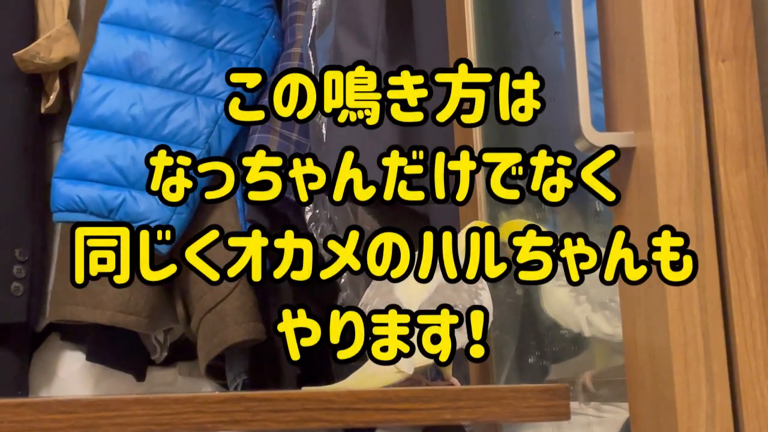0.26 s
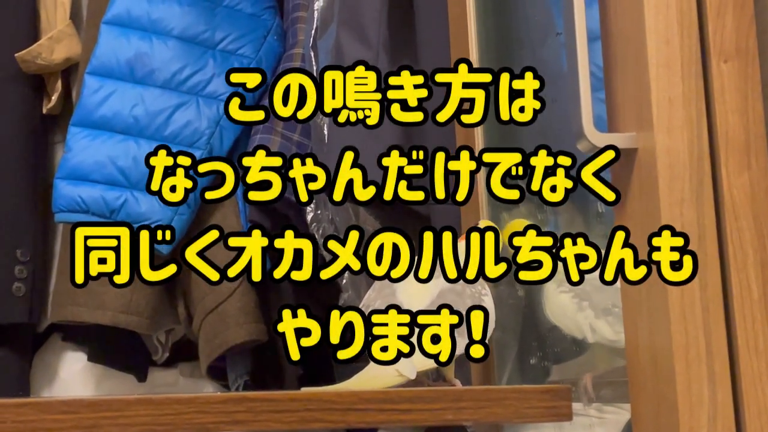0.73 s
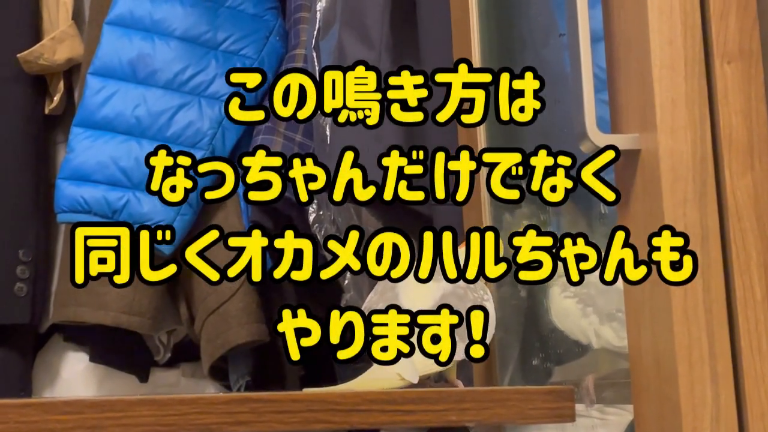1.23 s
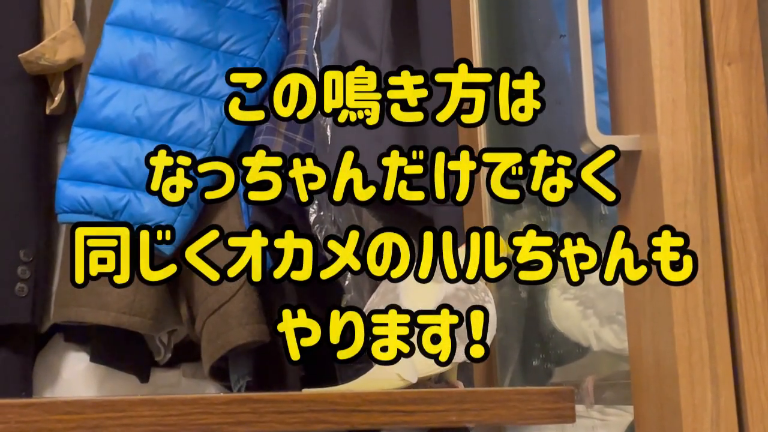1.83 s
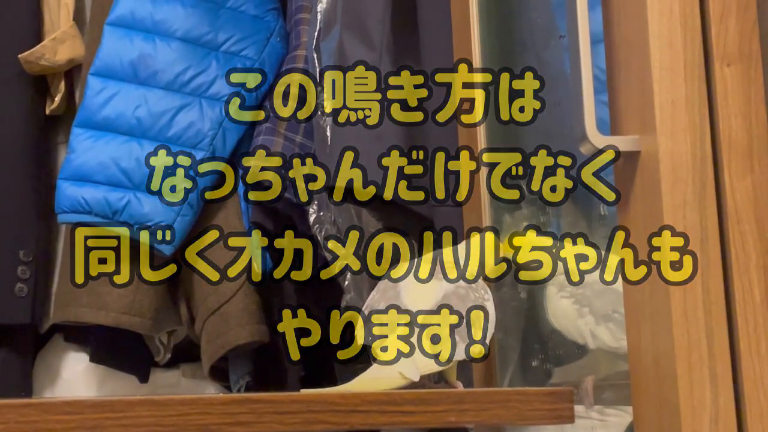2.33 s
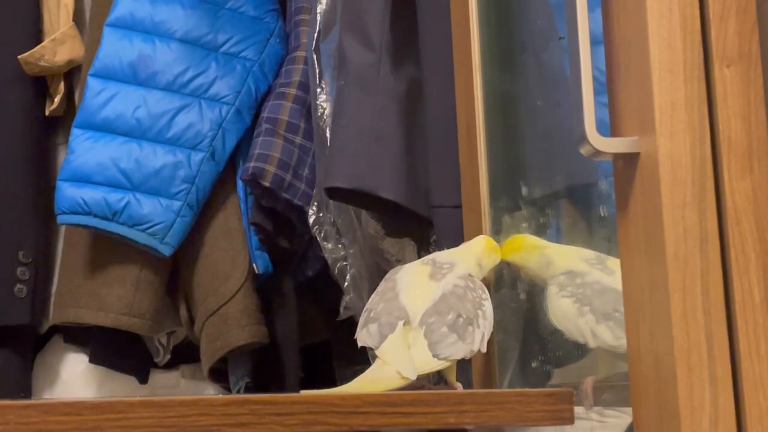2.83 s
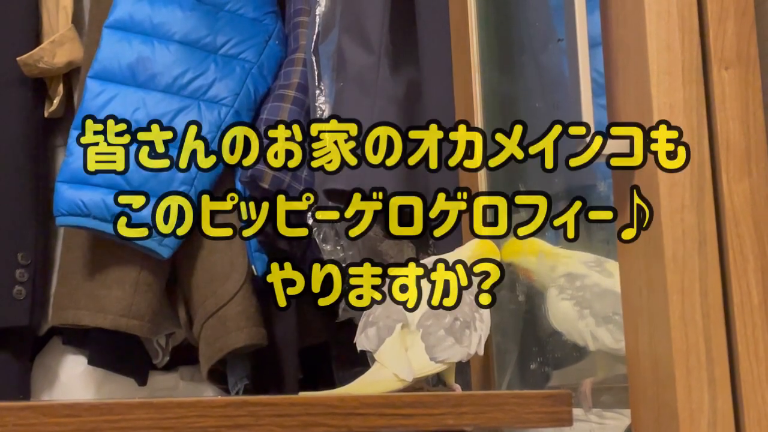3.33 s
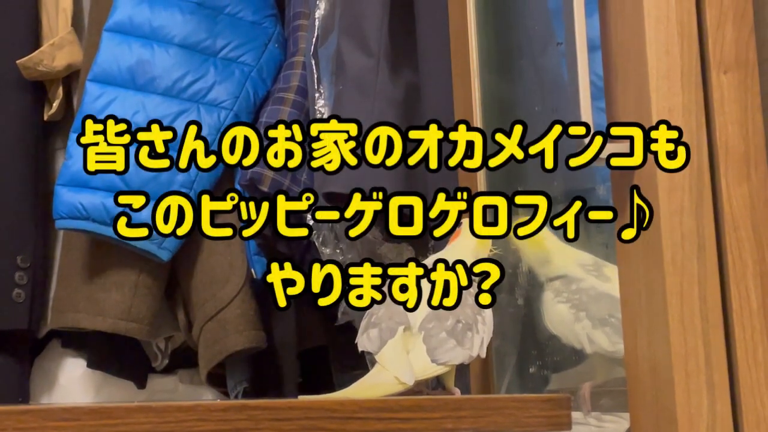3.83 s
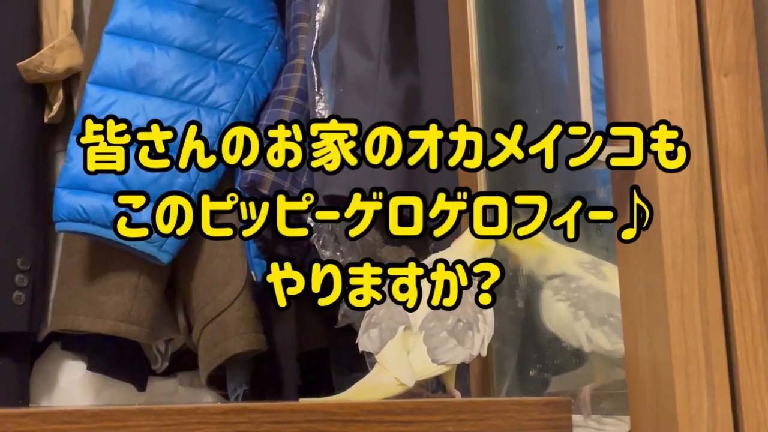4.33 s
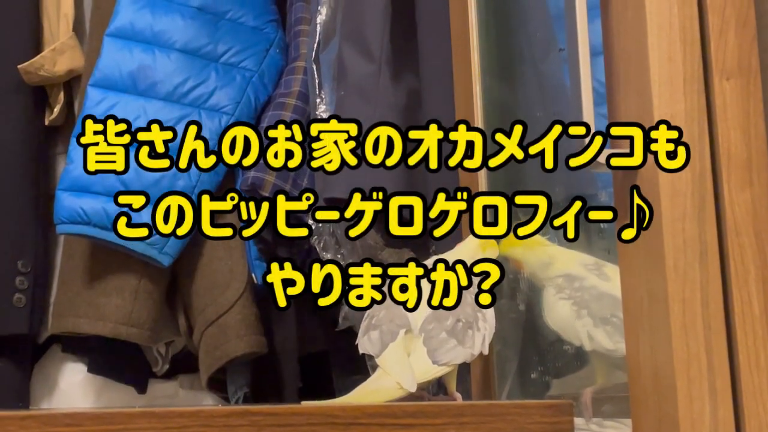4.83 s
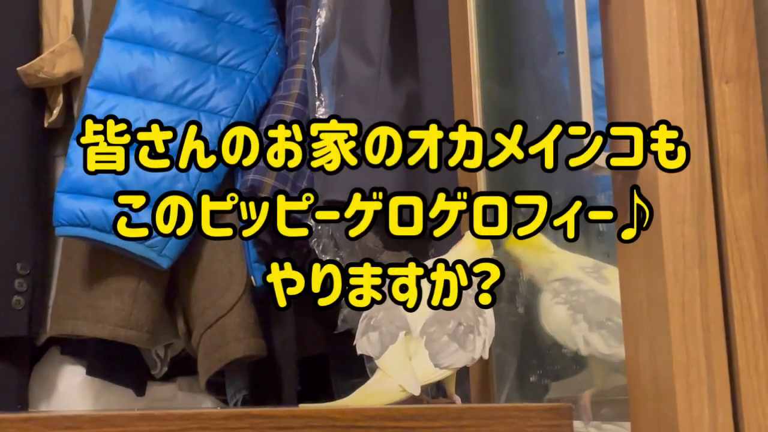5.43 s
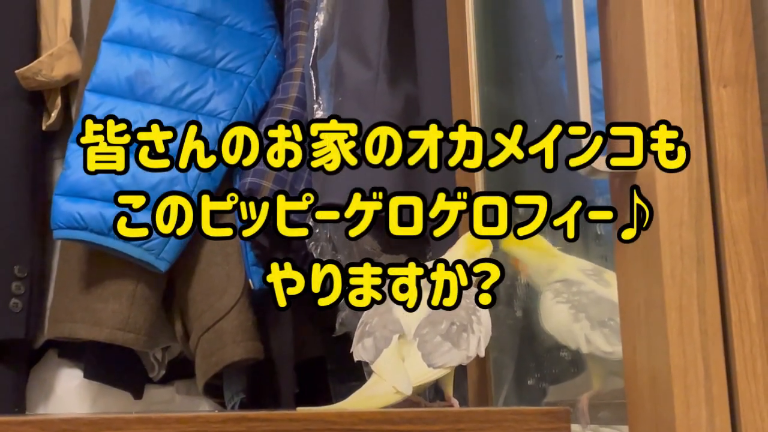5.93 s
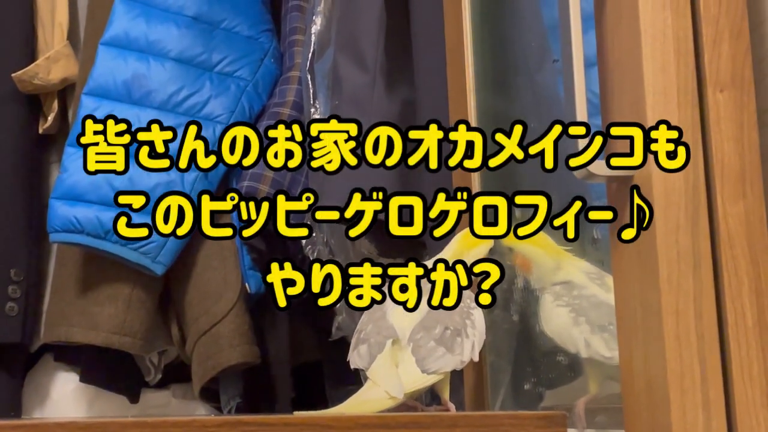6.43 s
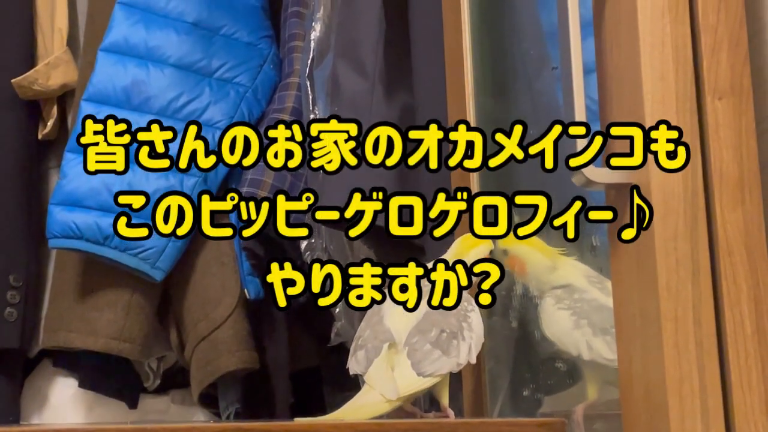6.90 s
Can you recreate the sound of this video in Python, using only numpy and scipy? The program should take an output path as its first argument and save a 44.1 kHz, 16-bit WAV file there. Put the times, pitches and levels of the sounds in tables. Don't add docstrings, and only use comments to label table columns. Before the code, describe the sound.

Pet cockatiel at a mirror runs through a looping song of clear whistles, raspy croaks and buzzy trills, with faint household hum in the gaps.

```python
import sys
import numpy as np
from scipy import signal
from scipy.fft import rfft, irfft, next_fast_len
from scipy.io import wavfile
from scipy.ndimage import uniform_filter1d, map_coordinates

SR = 44100
rng = np.random.default_rng(int(sys.argv[2]) if len(sys.argv) > 2 else 0)


def persist_wave(psi):
    counts = np.round(np.clip(psi, -1, 1) * 32767).astype(np.int16)
    wavfile.write(sys.argv[1], SR, np.atleast_2d(counts).T)


def linear_from_db(decibels):
    return 10 ** (np.asarray(decibels, float) / 20)


N = 315756

# frequency in Hz, density in dB per Hz.
HUM_DB = [(12, -43.5), (20, -20.5), (63, 1.5), (104, -1), (196, -13.5), (288, -13.5), (572, -14.5),
          (693, -21), (1240, -28.5), (1670, -32), (2390, -29.5), (3320, -49), (4030, -44), (4750, -52),
          (14300, -75.5)]
# frequency in Hz, correlation from 0 to 1.
HUM_LIKENESS = [(60, 1), (200, .75), (600, .35), (1300, 0.05), (4000, 0.24)]
# frequency in Hz, T60 in seconds.
ROOM_T60_S = [(800, 0.15), (1600, .24), (2500, 0.22), (4000, 0.2), (8000, 0.16)]
# delay in seconds, level in dB.
WALL_COPIES = [(.0011, -17), (.0034, -11.5), (.0062, -14.5), (0.0104, -12), (.016, -12), (.023, -14)]
# frequency in Hz, phase in radians.
WALL_TURN_RAD = [(500, .7), (1500, 1.1), (2000, .35), (4000, .45), (7000, .1)]
# frequency in Hz, lead in radians.
PORT_LEAD_RAD = [(60, 0), (430, .6), (1120, -.2), (2760, .3), (4910, .1), (6890, -.9), (8300, -3.1),
                 (11000, -6), (12800, -7.2), (14400, -9.4)]
# frequency in Hz, left over right in dB.
PORT_BALANCE_DB = [(100, .5), (370, 4.5), (1230, .5), (2250, 1.2), (4120, 0)]
# frequency in Hz, level in dB.
BEAK_DB = [(2500, 16), (5000, 0), (6500, -17), (7600, -22), (8400, -26), (10400, -37), (12000, -43),
           (14500, -26), (16000, -54)]
# frequency in Hz, level in dB.
RASP_DB = [(500, -38), (1000, -19.5), (1700, -3), (3800, 3.5), (5200, -19), (6500, -18.5), (8000, -22),
           (11400, -39.5), (15500, -53.5)]
# frequency in Hz, level in dB.
NOSTRIL_DB = [(7000, -29), (8500, -5), (10500, 0), (12300, -4), (13500, -16), (15500, -12.5)]

SYLLABLES_A = { "dip": [(0, 1.02, -10, -27, -55), (.04, 1, -1, -27, -55), (.3, .97, -2, -27, -48),
               (.5, .83, -2, -26, -42), (.8, .85, -4, -33, -42), (.97, .99, -6, -35, -50)],
               "pipe": [(0, 1, -5, -36, -51), (.25, 1, -4, -34, -55), (.4, 1, 0, -31, -55),
               (.54, 1, -5, -30, -50), (.62, .97, -30, -30, -45), (.68, .97, -30, -30, -45),
               (.76, 1, -9, -36, -45), (1, 1, -24, -40, -45)], "pip": [(0, .8, -19, -14, -32),
               (.09, .8, -9, -10, -32), (.42, 1, 0, -30, -42), (.66, .95, -2, -39, -47),
               (.88, .69, -21, -26, -30), (1, .65, -50, -26, -30)], "croak": [(0, 1.02, -5, 3, -8),
               (.2, .99, 0, -5, -7), (.45, .97, -4, -3, -6), (.6, .95, -11, 5, 0), (.85, .93, -15, 7, 1),
               (1, .92, -30, 5, -1)], "caw": [(0, 1.02, -6, -10, -10), (.17, 1, 1, -6, -4), (.3, 1, 0, -13, -4),
               (.45, .99, 0, -6, -9), (.6, .97, -8, 2, -2), (.85, .92, -15, 3, -1), (1, .9, -28, 3, -1)], }
SYLLABLES_B = { "squeak": [(0, .32, -25, -24, -44), (.07, .36, 2, -24, -44), (.24, .62, -3, -39, -39),
               (.36, .97, -14, -38, -38), (.6, 1, -1, -35, -37), (1, .97, -20, -33, -36)],
               "flat": [(0, .95, -10, -15, -40), (.08, .98, -4, -15, -40), (.35, 1, -1, -18, -27),
               (.67, 1, 0, -5, -26), (.84, 1, -17, -13, -16), (1, .97, -25, -13, -16)],
               "lead": [(0, .97, -14, -13, -20), (.08, 1, -2, -15, -17), (.97, 1, 0, -19, -18)],
               "rise": [(0, .55, -14, -18, -27), (.3, .66, -8, -25, -30), (.58, .86, -1, -27, -36),
               (.66, 1, 0, -27, -46), (.86, .99, -4, -30, -50), (1, 1, -25, -30, -44)], }
SYLLABLES_C = { "low": [(0, .95, -30, -11, -26), (.04, 1, -8, -11, -26), (.3, 1, -8, -12, -18),
               (.65, 1.05, -2, -15, -21), (.8, 1.04, 0, -15, -30), (1, .99, -14, -10, -30)],
               "leap": [(0, .42, -7, -22, -50), (.1, .45, -4, -23, -52), (.32, .58, 4, -27, -50),
               (.48, .7, -6, -40, -40), (.57, .98, -3, -36, -45), (.75, 1.01, -1, -36, -45),
               (.92, .98, -4, -38, -45), (.995, .78, -8, -40, -45)], "warble": [(0, .8, -20, 10, -30),
               (.07, .79, -12, 8, -22), (.2, .78, -9, 6, -22), (.42, .73, -11, 1, -28),
               (.61, .65, -18, -4, -40), (.84, .7, -16, 0, -38), (.97, .77, -13, -6, -28)],
               "hold": [(0, 1, -12, -10, -25), (.25, 1, 0, -16, -18), (.75, 1, -4, -18, -7),
               (.97, 1, 0, -7, -18)], "held": [(0, 1, -8, -8, -20), (.3, 1, 0, -14, -12), (.6, 1, 0, -16, -8),
               (.72, 1, -13, -6, 2), (.99, 1, -16, -2, 3)], }
SYLLABLES_D = { "swoop": [(0, 1.12, -14, -25, -45), (.3, 1, 0, -25, -45), (.55, .9, -1, -20, -35),
               (.95, .52, -5, 0, -17)], "climb": [(.045, .61, -20, -2, 3), (.075, .63, 0, -8, -14),
               (.3, .77, -1, -21, -35), (.35, .89, -2, -28, -45), (.61, 1.005, 2, -33, -58),
               (.68, 1, -12, -28, -45), (.73, 1.02, -4, -25, -45), (.8, .97, -10, -8, -36),
               (1, 1, -14, -27, -50)], "stair": [(0, .615, -6, -8, -20), (.13, .69, 0, -15, -31),
               (.31, .717, -3, -24, -45), (.39, .92, -5, -28, -51), (.59, 1, 0, -37, -56),
               (.84, 1, 0, -48, -63), (1, 1.015, -20, -48, -63)], }
SYLLABLES_E = { "rasp": [(0, 1, -22, -12, -30), (.06, 1, -8, -7, -29), (.36, 1.07, -9, 0, -15),
               (.63, 1.01, 0, -2, -17), (.9, 1, 0, 3, -11), (.97, 1.03, 1, -5, -17)],
               "trill": [(0, .79, -7, -8, -19), (.22, .875, -3, -30, -31), (.55, .99, 0, -26, -45),
               (.78, 1.01, -12, -23, -54), (1, 1, -23, -23, -54)], "long trill": [(0, .64, -11, -11, -21),
               (.11, .69, -7, -25, -32), (.41, .835, -1, -23, -40), (.75, .97, -1, -23, -38),
               (.86, 1.1, -3, -31, -38), (.94, 1.28, -10, -31, -38), (1, 1.3, -20, -31, -38)], }
SYLLABLES = SYLLABLES_A | SYLLABLES_B | SYLLABLES_C | SYLLABLES_D | SYLLABLES_E | {"cracked rise": SYLLABLES_B["rise"]}
CROAKS = {"dip": [(.32, 1.03, .1, 82, .19)], "pip": [(.7, 1, .12, 80, 0)],
          "croak": [(.14, .45, .36, 89, .03), (.45, 1, .52, 89, .05)], "swoop": [(0, 1, .2, 90, 0)],
          "caw": [(.05, .35, .14, 110, .02), (.35, 1, .55, 89, .03)], "held": [(0, .4, .2, 90, .02)],
          "squeak": [(.07, .4, .35, 90, .02), (.5, .85, .1, 90, .01)], "flat": [(.05, .46, .04, 79, .035)],
          "cracked rise": [(0, .7, .2, 78, .09)], "leap": [(0, .55, .22, 89, .06), (.55, 1, .07, 89, .015)],
          "warble": [(-.06, .55, .13, 60.6, .1), (.55, .75, .12, 90, .03), (.75, 1, .26, 90, .06)],
          "climb": [(.12, .38, .03, 100, .03), (.65, .7, .3, 90, 0), (.76, .86, .45, 90, .02),
          (.86, 1, .15, 90, .007)], "hold": [(0, .3, .25, 90, .02), (.3, .8, .1, 90, .01)],
          "stair": [(.11, .41, 0, 90, .024)], "rasp": [(0, .56, .32, 100, .04), (.56, 1, .05, 100, .01)],
          "trill": [(.02, .89, 0, 82.5, .09)], "long trill": [(0, 1, .035, 92.3, .085)]}
SLIDES = {"rasp": [(0, 1.3), (.55, 2)], "warble": [(0, 1.56), (.42, 1.33), (.6, 1.06), (.84, 1.4),
          (1, 1.85)], "hold": [(0, 1.85), (.3, 2)], "held": [(0, 1.85), (.3, 2)], "climb": [(.76, 2),
          (.79, 1.65), (.84, 1.65), (.87, 2)], "croak": [(.15, 2), (.3, 2.15), (1, 2.15)], "caw": [(.3, 2),
          (.4, 2.15), (1, 2.15)]}
# syllable, start in seconds, length in seconds, level in dB,
# glide start in Hz, glide end in Hz.
SHORT_CALLS = [("dip", .043, .074, -18, 2270, 2150), ("pipe", .117, .061, -13, 2145, 2150),
               ("pip", .41, .048, -11.5, 2380, 2330), ("caw", 1.598, .07, -24.5, 1750, 1650),
               ("squeak", 1.98, .07, -36, 4120, 4120), ("flat", 2.608, .092, -21, 1620, 1620),
               ("lead", 2.784, .028, -31, 1280, 1215), ("rise", 2.812, .073, -12, 2230, 2540),
               ("swoop", 3.167, .017, -23.5, 3800, 3800), ("croak", 3.184, .084, -23, 1860, 1800),
               ("dip", 3.519, .078, -17, 2100, 2110), ("pipe", 3.597, .036, -19, 2110, 2130),
               ("pip", 3.856, .046, -8, 2400, 2460), ("swoop", 5.062, .013, -29, 2650, 3400),
               ("croak", 5.076, .074, -22, 1830, 1800), ("lead", 5.938, .062, -30, 1235, 1270),
               ("cracked rise", 6.0, .07, -22, 2300, 2080), ("pip", 6.339, .045, -12, 2340, 2320),
               ("dip", 6.663, .087, -19, 2180, 2160), ("pipe", 6.749, .046, -12, 2150, 2150)]
# syllable, start in seconds, length in seconds, level in dB,
# glide start in Hz, glide end in Hz.
PHRASES = [("low", .662, .128, -27, 1245, 1230), ("leap", .808, .072, -26, 3600, 3280),
           ("warble", .88, .19, -23, 2010, 2010), ("held", 1.07, .07, -21, 1530, 1640),
           ("climb", 1.14, .16, -16.5, 2680, 2685), ("rasp", 2.218, .112, -25, 1510, 1515),
           ("trill", 2.33, .09, -16, 2000, 2000), ("low", 4.122, .123, -26, 1230, 1270),
           ("leap", 4.252, .073, -26, 3300, 3470), ("warble", 4.325, .187, -22.5, 1960, 2010),
           ("hold", 4.512, .091, -21, 1570, 1670), ("stair", 4.603, .162, -13, 2722, 2725),
           ("rasp", 5.38, .115, -25, 1550, 1510), ("long trill", 5.495, .133, -11, 2480, 2480),
           ("low", 6.953, .132, -27, 1220, 1250), ("leap", 7.097, .073, -26, 3400, 3550)]
SONG = SHORT_CALLS + PHRASES

ATTACK_S, JOIN_S = .002, .003
WHISPER_S, WHISPER_DB = .011, -26
LATE_DB, LATE_T60_RATIO_S = -22, 1.9
SWAP_DB = 70
SUM_DB, DIFFERENCE_DB, OCTAVE_DB = -19, -22, -25
SHIVER_RAD = .045


def unit(x):
    return x / np.sqrt(np.mean(x ** 2) + 1e-20)


def along(points, hz):
    f, v = np.transpose(points)
    return np.interp(np.log(hz + 1), np.log(f + 1), v)


def wobble(rate_hz, samples):
    knots = rng.standard_normal(int(N * rate_hz / SR) + 4)
    return map_coordinates(knots, [samples * rate_hz / SR])


def filtered(x, response):
    m = next_fast_len(N + SR // 2)
    return irfft(rfft(x, m) * response(np.fft.rfftfreq(m, 1 / SR)), m)[..., :N]


def hiss(spectrum_db):
    return unit(filtered(rng.standard_normal(N), lambda f: linear_from_db(along(spectrum_db, f))))


def household(patchy_db):
    z = signal.stft(rng.standard_normal((2, N)), nperseg=1024)[2]
    patches = uniform_filter1d(rng.standard_normal(z.shape[1:]), size=5, axis=0)
    patches = uniform_filter1d(patches, size=8, axis=1)
    pair = signal.istft(z * linear_from_db(patchy_db * unit(patches)), nperseg=1024)[1][:, :N]

    def mid_side(f):
        turn_rad = np.arccos(np.clip(along(HUM_LIKENESS, f), -1, 1)) / 2
        return linear_from_db(along(HUM_DB, f)) * [np.cos(turn_rad), np.sin(turn_rad)]

    mid, side = filtered(pair, mid_side)
    return unit(np.array([mid + side, mid - side]))


def ducking(x, start_db, slope, lag_s):
    pole = np.exp(-1 / (lag_s * SR))
    slow = x ** 2
    for _ in range(2):
        slow = signal.lfilter([1 - pole], [1, -pole], slow)
    over_db = 10 * np.log10(slow + 1e-12) - start_db
    return linear_from_db(-slope * uniform_filter1d(np.clip(over_db, 0, None), size=3000))


def room(x, shared):
    hz, t, z = signal.stft(rng.standard_normal((2, SR // 2)), SR, nperseg=256)
    t60_s = along(ROOM_T60_S, hz)[:, None]
    early = linear_from_db(-60 * t / t60_s)
    late = linear_from_db(LATE_DB - 60 * t / LATE_T60_RATIO_S / t60_s)
    common, apart = signal.istft(z * (early + late), SR, nperseg=256)[1]
    tails = np.array([shared * common + apart, shared * common - apart])
    tails = tails / np.linalg.norm(tails[0])
    return signal.fftconvolve(np.pad(x, (200, 0))[None], tails, axes=1)[:, :N]


def near_walls(x):
    side = np.array([[1], [-1]])

    def response(f):
        total = 1
        for k, (delay_s, db) in enumerate(WALL_COPIES):
            turn_rad = (-1) ** k * side * along(WALL_TURN_RAD, f)
            total = total + linear_from_db(db) * np.exp(-2j * np.pi * f * delay_s + 1j * turn_rad)
        return total

    return filtered(x, response)


def breath():
    t = np.arange(N) / SR
    on = np.zeros(N, bool)
    for _, start, length, *_ in SONG:
        on |= (t > start) & (t < start + length + JOIN_S)
    lead = round(WHISPER_S * SR)
    ahead = np.pad(on[lead // 2:] * 1., (0, lead // 2), "edge")
    whisper = linear_from_db(WHISPER_DB) * uniform_filter1d(ahead, size=lead)
    since_onset_s = t - np.maximum.accumulate(t * ~on)
    caught = np.clip(since_onset_s / ATTACK_S, 0, 1) ** 2
    return [np.round(uniform_filter1d(v, size=90), 9) for v in (caught, whisper)]


def gestures():
    rows = []
    for name, start, length, db, from_hz, to_hz in SONG:
        for share, pitch, rel_db, second_db, third_db in SYLLABLES[name]:
            hz = pitch * from_hz * (to_hz / from_hz) ** share
            rows.append((start + share * length, hz, db + rel_db, second_db, third_db))
    s, *columns = np.transpose(sorted(rows))
    return [np.interp(np.arange(N) / SR, s, column) for column in columns]


def croak():
    t = np.arange(N) / SR
    rough, warble, multiple = np.zeros(N), np.zeros(N), np.full(N, 2.)
    for name, start, length, *_ in SONG:
        for first, last, share, rate_hz, depth in CROAKS.get(name, []):
            a, b = start + first * length, start + last * length
            on = (t >= a) & (t < b)
            rough[on] = share
            fade = signal.windows.tukey(round((b - a) * SR) + 2, .4)[:on.sum()]
            warble[on] = depth * fade * np.cos(2 * np.pi * rate_hz * (t[on] - (a + b) / 2))
        if name in SLIDES:
            multiple += np.interp((t - start) / length, *np.transpose(SLIDES[name]), left=2, right=2) - 2
    return uniform_filter1d(rough, size=450), warble, multiple


def second_voice(hz, phase, upper, multiple, second_db, turns_db):
    loose = np.clip(8 * (2 - multiple), 0, 1)

    def heard(share):
        return np.clip(share * hz / 200 - 3.5, 0, 1)

    octave = loose * linear_from_db(OCTAVE_DB) * np.sin(2 * upper)
    tone = linear_from_db(second_db + turns_db) * (np.sin(upper) + octave)
    differences = heard(multiple - 1) * np.sin(upper - phase) + heard(2 - multiple) * np.sin(2 * phase - upper)
    products = linear_from_db(SUM_DB) * np.sin(upper + phase) + linear_from_db(DIFFERENCE_DB) * differences
    return tone + loose * linear_from_db(second_db / 2) * products


def high_partials(hz, shiver, third_db, shake):
    source_db = third_db - along(BEAK_DB, 3 * hz)
    tone = 0
    for k in range(3, 13):
        size = linear_from_db(source_db + along(BEAK_DB, k * hz)) + linear_from_db(along(NOSTRIL_DB, k * hz) - 47)
        tone = tone + size * linear_from_db(3.8 * shake(200)) * (k * hz < 16000) * np.sin(k * shiver)
    return tone


def cockatiel():
    caught, whisper = breath()
    on = caught + whisper > 0
    hz, db, second_db, third_db, rough, warble, multiple = [v[on] for v in (*gestures(), *croak())]
    caught, whisper = caught[on], whisper[on]
    samples = np.flatnonzero(on)

    def shake(rate_hz):
        return wobble(rate_hz, samples)

    rough = rough + .08 * (1250 / hz) ** 2.5
    hz = hz * (1 + warble + rough * .06 * shake(200))
    jitter = 2 * np.pi * np.cumsum(.16 * rough * hz * shake(1500)) / SR
    phase = 2 * np.pi * np.cumsum(hz) / SR
    upper = 2 * np.pi * np.cumsum(multiple * hz) / SR + jitter
    crest = linear_from_db(30 * warble)
    flutter = 1 + (.13 + .3 * rough) * shake(150) + 1.1 * rough * shake(1200)
    swing = np.sqrt(2) * crest * flutter

    turns_db = SWAP_DB * warble * (multiple < 2)
    first = linear_from_db(-turns_db) * np.sin(phase + .7 * jitter)
    tone = second_voice(hz, phase, upper, multiple, second_db, turns_db)
    tone += high_partials(hz, phase + jitter + SHIVER_RAD * shake(700), third_db, shake)

    brightness_db = .13 * (second_db + third_db) / 2
    air = hiss(NOSTRIL_DB)[on]
    rasp = rough * (linear_from_db(brightness_db - 6) * hiss(RASP_DB)[on] + linear_from_db(-28) * air) + linear_from_db(-56) * air
    voice = np.zeros(N)
    voice[on] = linear_from_db(db) * (np.maximum(caught, whisper) * swing * first + caught * (swing * tone + rasp))
    return voice


def scene():
    bird = linear_from_db(-2.5) * near_walls(cockatiel())
    pressed = ducking(bird[0], start_db=-23, slope=1.9, lag_s=.115)
    house = linear_from_db(-51.5) * household(patchy_db=.8) * pressed
    return bird + linear_from_db(-16) * room(bird[0], shared=3.5) + house


def top_cut(x):
    return signal.sosfilt(signal.butter(12, 14410, fs=SR, output="sos"), x)


def record(dry):
    half = np.array([[.5], [-.5]])

    def port_response(f):
        return linear_from_db(half * along(PORT_BALANCE_DB, f)) * np.exp(1j * half * along(PORT_LEAD_RAD, f))

    return top_cut(filtered(dry, port_response))


dry = scene()
out = record(dry)
persist_wave(out)
```